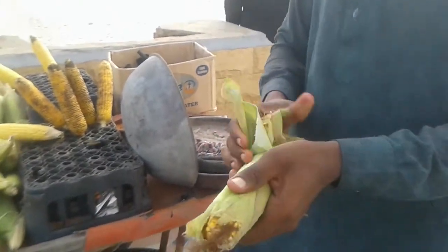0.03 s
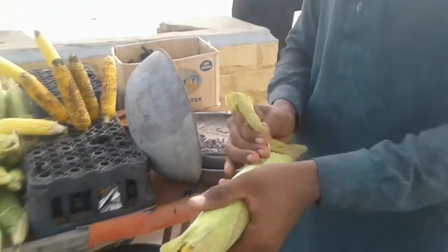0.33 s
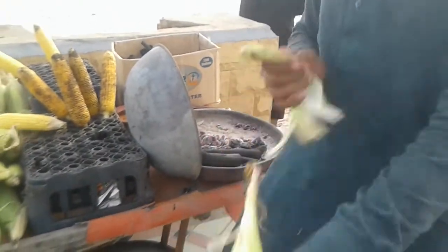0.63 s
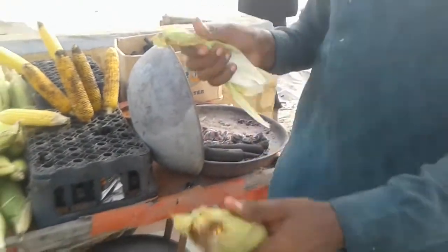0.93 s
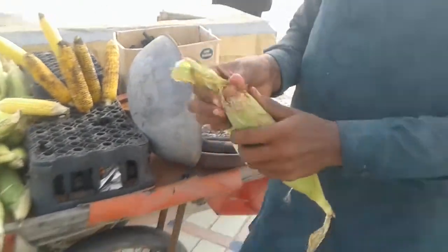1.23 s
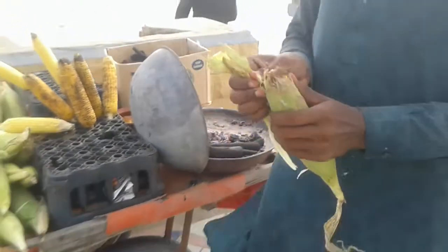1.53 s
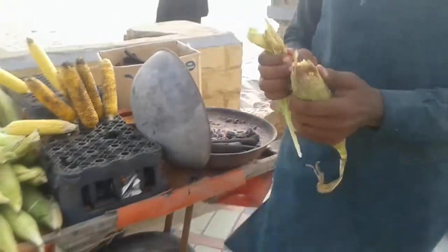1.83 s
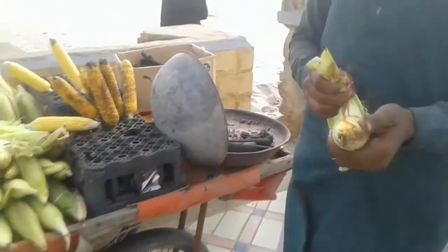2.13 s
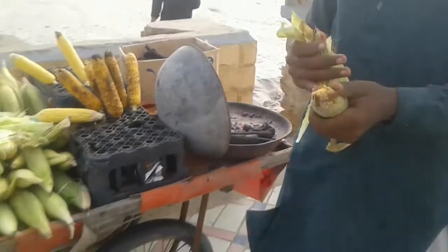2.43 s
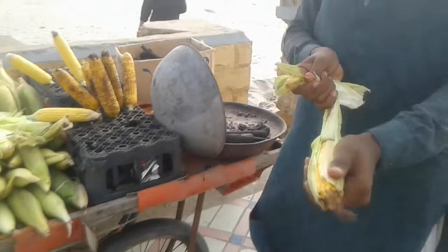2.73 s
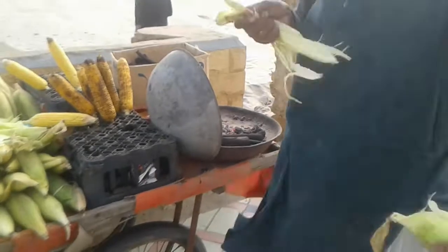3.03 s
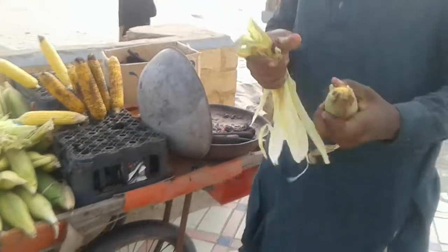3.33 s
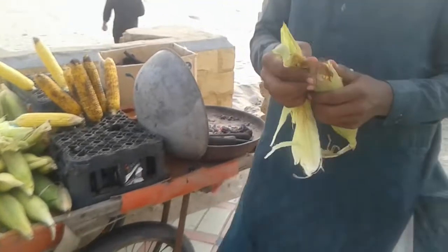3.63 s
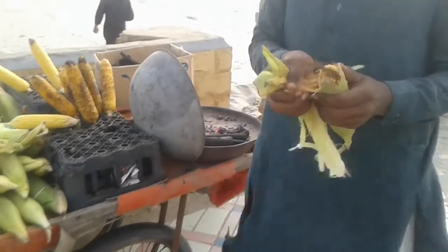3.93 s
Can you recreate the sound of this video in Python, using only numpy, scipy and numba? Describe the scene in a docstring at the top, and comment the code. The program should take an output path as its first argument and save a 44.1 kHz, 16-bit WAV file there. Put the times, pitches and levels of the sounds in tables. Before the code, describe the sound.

Corn husks are ripped off a cob outdoors: a crackling tear at about 0.4 seconds, then a louder one with sharp snaps near 0.7. From there to the end at 4 seconds, uneven wind gusts buffet the microphone with occasional pops, largely masking two more rips around 2.1 and 2.8 seconds. Loose leaves rustle softly between pulls, over a faint hum of distant traffic.

```python
"""An open-air street stall: green husks are stripped from a corn cob.
Fibres part in dense crackling rips and stiff ribs snap. Gusts buffet the microphone; the faster
the air, the louder and brighter its eddies, and they largely mask the later rips.
Loose leaves rustle between pulls, over the hum of distant traffic."""
import sys
import numpy as np
from scipy import signal
from scipy.fft import rfft, irfft
from scipy.io import wavfile
from scipy.ndimage import uniform_filter1d, minimum_filter1d, map_coordinates
from numba import njit

SR = 44100
rng = np.random.default_rng(int(sys.argv[2]) if len(sys.argv) > 2 else 0)


def to_wav(s):
    """Save 16-bit WAV."""
    ch = np.atleast_2d(s).T  # columns
    pcm = np.round(np.clip(ch, -1, 1) * 32767)  # PCM
    wavfile.write(sys.argv[1], SR, pcm.astype(np.int16))


N = 176400
T = np.arange(N) / SR
F = np.maximum(np.fft.rfftfreq(2 * N, 1 / SR), 1)


def undb(db):
    """Decibels to gain."""
    return 10 ** (np.asarray(db) / 20)


def unit(x):
    """Scale to rms 1."""
    return x / np.std(x)


def steady(x):
    """Level out slow swells by the running rms."""
    return x / np.sqrt(uniform_filter1d(x * x, size=900) + 1e-6)


def shaped(x, gain):
    """Filter by a gain per frequency."""
    return irfft(rfft(x, 2 * N) * gain)[:N]


def colour(points):
    """Gain per frequency from (Hz, dB) points."""
    hz, db = np.array(points).T
    return undb(np.interp(np.log(F), np.log(hz), db))


def low_cut(hz):
    """Gain of a second-order high-pass."""
    return 1 / np.sqrt(1 + (hz / F) ** 4)


def curve(points):
    """Gain over time from (s, dB) points."""
    return undb(np.interp(T, *np.array(points).T))


def drift(rate_hz):
    """Smooth random signal, rms 1."""
    return unit(shaped(rng.standard_normal(N), np.exp(-(F / rate_hz) ** 2)))


def flutter(rate_hz):
    """Drift with soft-limited peaks, rms 1."""
    return unit(np.tanh(0.711 * drift(rate_hz)))


def ring(x, hz, width):
    """Resonance; width is a fraction of its frequency."""
    return signal.lfilter(*signal.iirpeak(hz, 1 / width, fs=SR), x)


@njit
def moving_ring(x, hz, width):
    """Resonance with a moving centre, gain 1 there."""
    y, band_state, low_state = np.empty(len(x)), 0., 0.
    for i in range(len(x)):
        g = np.tan(np.pi * hz[i] / SR)
        band = (band_state + g * (x[i] - low_state)) / (1 + g * (g + width))
        band_state = 2 * band - band_state
        low_state += 2 * g * band
        y[i] = width * band
    return y


def crackle(per_s, spread_db):
    """Random tiny fractures: many weak, a few strong."""
    clicks = (rng.random(N) < per_s / SR) * rng.choice([-1, 1], N)
    return clicks * undb(spread_db * np.minimum(rng.exponential(size=N), 5))


def traffic(level_db=-38.5):
    """Distant engines and tyres: a hum that wavers slightly."""
    # Each row: frequency in Hz, gain in dB.
    spectrum = [(25, -42), (70, -9), (155, 0.5), (340, -7.5), (500, -16.5), (850, -13.5), (1400, -20.5),
                (15000, -54.5)]
    hum = unit(shaped(rng.standard_normal(N), colour(spectrum)))
    return hum * undb(level_db - drift(6.7))


def rustle(tick_db=-73, tick_decay_s=.0011):
    """Loose leaves slide through the fingers; small creases give way in ticks."""
    # Each row: time in seconds, level in dB.
    levels = [(.04, -63), (.19, -74), (.36, -70), (.6, -41.5), (.76, -45.5), (1.2, -46.5), (1.29, -50.5),
              (2.0, -68), (2.58, -48.5), (4, -78)]
    # Each row: frequency in Hz, gain in dB.
    spectrum = [(1500, 4.5), (4000, -13), (5500, -13.5), (15500, -31)]
    grains = crackle(per_s=4000, spread_db=3.5) * undb(2 * drift(30))
    sliding = curve(levels) * unit(shaped(grains, colour(spectrum) * low_cut(1200)))
    decay = np.exp(-T[T < .02] / tick_decay_s)
    creases = signal.fftconvolve(np.abs(crackle(per_s=120, spread_db=1)), decay)[:N]
    ticks = ring(creases * rng.standard_normal(N), hz=7000, width=.94)
    return sliding + undb(tick_db) * unit(ticks)


def eddies(hz, cut_hz, field_hz=704.2):
    """A frozen eddy field sweeps past the microphone port: faster air shifts it up in frequency."""
    field = unit(shaped(rng.standard_normal(N), np.exp(-F / field_hz)))
    position = np.cumsum(hz / field_hz) % (N - 1)
    swept = map_coordinates(field, [position], order=3, mode="wrap")
    return unit(shaped(swept, low_cut(cut_hz)))


def wind(edge_s=.00516, wake_s=.016, wake_db=-8, gust_gain_db=.47, breeze_hz=169.66):
    """Fluttering gusts, each with a short wake of slow eddies, over a softer, duller breeze."""
    # Each row: start in seconds, length in seconds, relative level in dB, nominal eddy frequency in Hz.
    gust_events = [(0.54, 0.034, -24, 390), (0.595, 0.009, -22, 290), (0.684, 0.014, -12, 600),
                   (0.701, 0.019, -10, 540), (0.726, 0.015, -10, 660), (0.744, 0.022, -13, 540),
                   (0.77, 0.022, -14, 540), (0.886, 0.049, -17, 440), (1.002, 0.014, -10, 540),
                   (1.022, 0.034, -17, 400), (1.064, 0.035, -18, 620), (1.143, 0.023, -17, 460),
                   (1.202, 0.014, -14, 950), (1.22, 0.026, -14, 620), (1.248, 0.022, -15, 280),
                   (1.282, 0.011, -11, 780), (1.298, 0.031, -14, 820), (1.347, 0.031, -15, 740),
                   (1.387, 0.022, -16, 640), (1.413, 0.068, -18.5, 500), (1.484, 0.066, -13.5, 930),
                   (1.583, 0.011, -20, 800), (1.602, 0.009, -17, 820), (1.624, 0.029, -16, 610),
                   (1.678, 0.022, -17, 680), (1.712, 0.021, -15, 730), (1.757, 0.038, -14, 740),
                   (1.905, 0.05, -28, 200), (1.984, 0.028, -24, 530), (2.022, 0.073, -15, 850),
                   (2.1, 0.12, -16, 660), (2.228, 0.025, -14, 780), (2.263, 0.02, -14, 720),
                   (2.303, 0.056, -14, 860), (2.384, 0.012, -19, 630), (2.457, 0.03, -19, 510),
                   (2.513, 0.013, -18, 490), (2.558, 0.024, -16, 540), (2.598, 0.016, -14, 720),
                   (2.624, 0.018, -16, 630), (2.663, 0.017, -18, 540), (2.722, 0.038, -12.5, 880),
                   (2.765, 0.172, -14, 740), (2.94, 0.026, -19, 580), (3.014, 0.083, -16.5, 580),
                   (3.1, 0.1, -15, 850), (3.243, 0.012, -11, 600), (3.263, 0.014, -17, 480),
                   (3.295, 0.033, -14, 660), (3.343, 0.015, -14, 540), (3.364, 0.028, -14.5, 620),
                   (3.401, 0.047, -16.5, 540), (3.45, 0.072, -19, 650), (3.529, 0.051, -11, 1010),
                   (3.6, 0.01, -12, 720), (3.617, 0.007, -9, 800), (3.63, 0.03, -20, 780),
                   (3.669, 0.031, -17, 870), (3.703, 0.023, -14, 760), (3.728, 0.038, -17, 560),
                   (3.772, 0.058, -22, 660), (3.858, 0.012, -19, 440), (3.885, 0.017, -14, 940),
                   (3.915, 0.017, -14, 790), (3.952, 0.011, -16, 750), (3.974, 0.007, -10, 800),
                   (3.991, 0.009, -12, 750)]
    # Each row: time in seconds, relative level in dB.
    breeze_levels = [(0, -20.5), (.04, -59), (.45, -46), (.62, -29), (.95, -21.5), (1.12, -29), (1.27, -17),
                     (1.42, -20), (1.75, -21.5), (1.84, -32.5), (2.3, -18), (2.45, -28), (3.0, -24.5),
                     (3.6, -24), (4, -19)]
    # Each row: frequency in Hz, gain at the microphone port in dB.
    port_response = [(25, -11.5), (80, -1), (250, -2), (600, 1), (1700, 0.5), (3000, -3), (5000, -9.5)]
    force, hz = np.zeros(N), np.full(N, breeze_hz)
    for start_s, length_s, db, eddy_hz in gust_events:
        span = slice(int((start_s - .02) * SR), int((start_s + length_s + .2) * SR))
        age_s = T[span] - start_s
        past_end_s = age_s - length_s
        body = np.clip(np.minimum(age_s, -past_end_s) / edge_s + .5, 0, 1)
        wake = undb(wake_db) * np.exp(-np.clip(past_end_s / wake_s, 0, 20)) * (age_s > 0)
        envelope = np.maximum(body, wake)
        force[span] = np.maximum(force[span], envelope * undb(db))
        hz[span] = np.maximum(hz[span], envelope ** .6 * eddy_hz)
    speed = flutter(200.7)  # air speed moves pitch and level together
    fast_air = eddies(hz * np.exp(.21 * (speed - .6)), cut_hz=163) * undb(1.5 * speed)
    gusts = undb(gust_gain_db) * force * steady(fast_air)
    sway = flutter(34.6)
    slow_air = eddies(breeze_hz * np.exp(.2 * sway), cut_hz=193) * undb(4 * sway)
    breeze = curve(breeze_levels) * unit(slow_air)
    return shaped(gusts + breeze, colour(port_response))


def wind_pops():
    """A tight eddy crosses the port: a quick suction, then a push."""
    # Each row: time in seconds, peak in dB, width in seconds.
    pops = [(0.736, -12, 0.00047), (1.004, -4, 0.00038), (1.286, -9, 0.0012), (1.317, -7, .00022),
            (1.642, -11.5, .0009), (1.727, -17, 0.0012), (3.079, -8.5, 0.00027), (3.619, -6, 0.00019),
            (3.978, -7, 0.0002)]
    out = np.zeros(N)
    for time_s, db, width_s in pops:
        across = (T - time_s) / width_s
        out += undb(db) * np.pi * across / (1 + across ** 2) ** 2
    return out


def leaf_zip(start_s=.536, length_s=.019, ring_hz=6030, swell_db=16, peak_db=-12.5):
    """As the first pull ends, stick-slip clicks ring the taut leaf, slowing and growing."""
    from_hz, to_hz = 1500, 295
    progress = np.clip((T - start_s) / length_s, 0, 1)
    slipping = (progress > 0) * (progress < 1)
    rate_hz = (from_hz + (to_hz - from_hz) * progress) * slipping * np.exp(.13 * drift(400))
    slips = np.diff(np.floor(np.cumsum(rate_hz) / SR), prepend=0) * undb(swell_db * progress)
    leaf = ring(ring(slips, ring_hz, width=.4), ring_hz, width=.32)
    return undb(peak_db) * leaf / np.abs(leaf).max()


def rib_snaps(decay_s=.0008, tail_s=.0059, tail_db=-28):
    """Each husk rib breaks with a sharp crack and a short splintering tail."""
    # Each row: start in seconds, peak in dB, ring frequency in Hz.
    snaps = [(.3237, -37.5, 8000), (0.384, -32, 8500), (0.406, -21.5, 5700), (0.65, -8, 6800),
             (0.656, -12, 11800), (0.687, -9, 3860), (1.286, -36, 7850), (1.7754, -36, 6960),
             (2.04, -39, 7000), (2.067, -35, 6500), (2.5983, -30, 7700), (2.709, -28, 6000),
             (2.876, -24, 5600), (2.9123, -24, 6550)]
    out, age_s = np.zeros(N), T[:2048]
    envelope = np.exp(-age_s / decay_s) + undb(tail_db) * np.exp(-age_s / tail_s)
    for start_s, db, hz in snaps:
        burst = rng.standard_normal(len(age_s)) * envelope
        crack = ring(burst, hz, width=.39) + .22 * burst
        i = int(start_s * SR)
        out[i:i + len(crack)] += undb(db) * crack / np.abs(crack).max()
    return out


def husk_rips(brighten_db=9, upper_ratio=2.27, rasp_db=-2, gain_db=3):
    """Fibres part in uneven bundles, crisper along each pull, and ring two resonances of the strip."""
    # One list per pull. Each row: time in seconds, relative level in dB.
    pulls = [
        [(.383, -44), (.42, -47.5), (.448, -34), (.46, -39.5), (.508, -34.5), (.54, -35.5), (.562, -43),
         (.57, -58)],
        [(.647, -82), (.656, -23.5), (.668, -27), (.689, -28.5), (.697, -35), (.707, -31), (.718, -62)],
        [(2.07, -53), (2.088, -37), (2.14, -37.5), (2.175, -35.5), (2.192, -38.5), (2.2, -50), (2.215, -68)],
        [(2.704, -50), (2.725, -40.5), (2.79, -35.5), (2.86, -42), (2.885, -38), (2.916, -42), (2.928, -56)],
    ]
    # Each row: frequency in Hz, gain in dB.
    spectrum = [(550, -1.5), (1000, -1), (2500, -4), (6500, -8), (8900, -13.5), (15500, -22)]
    # Each row: time in seconds, lower resonance of the taut strip in Hz.
    resonance = [(.425, 3120), (.45, 2100), (.48, 2600), (.525, 1880)]
    force, progress = np.zeros(N), np.zeros(N)
    for pull in pulls:
        start_s, end_s = pull[0][0], pull[-1][0]
        pulling = (T > start_s) * (T < end_s)
        force += pulling * curve(pull)
        progress += pulling * (T - start_s) / (end_s - start_s)
    fibres = crackle(per_s=8000, spread_db=2.5)
    bundles = undb(1.5 * drift(200))
    tear = shaped(fibres * bundles, colour(spectrum) * low_cut(460))
    treble = shaped(tear, low_cut(7000))
    tear += (undb(brighten_db * (progress - .5)) - 1) * treble
    lower_hz = np.interp(T, *np.array(resonance).T)
    rasp = sum(moving_ring(tear, lower_hz * ratio, width=.18) for ratio in (1, upper_ratio))
    return undb(gain_db) * force * unit(tear + undb(rasp_db) * rasp)


def scene():
    """Wind, husk and street at one microphone."""
    return (wind() + wind_pops() + husk_rips() + rib_snaps() + leaf_zip() + rustle() + traffic())[None]


def record(dry):
    """A limiter holds the peaks under the ceiling; a steep low-pass cuts the top."""
    ceiling, top_hz = .93, 15800
    gain = np.minimum(1, ceiling / (np.abs(dry) + 1e-9))
    gain = uniform_filter1d(minimum_filter1d(gain, size=120), size=120)
    return signal.sosfilt(signal.ellip(10, .2, 80, top_hz, fs=SR, output="sos"), dry * gain)


dry = scene()
out = record(dry)
to_wav(out)
```